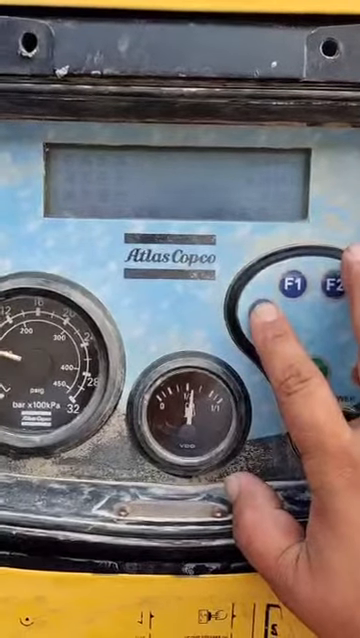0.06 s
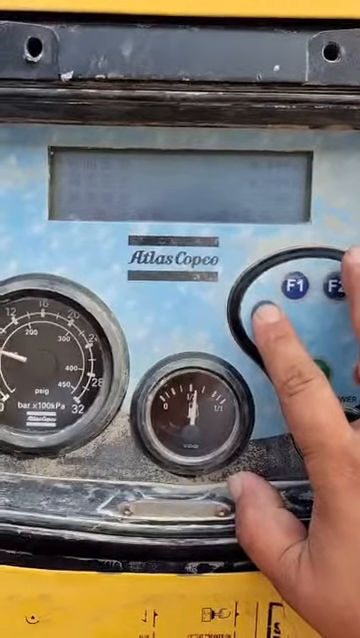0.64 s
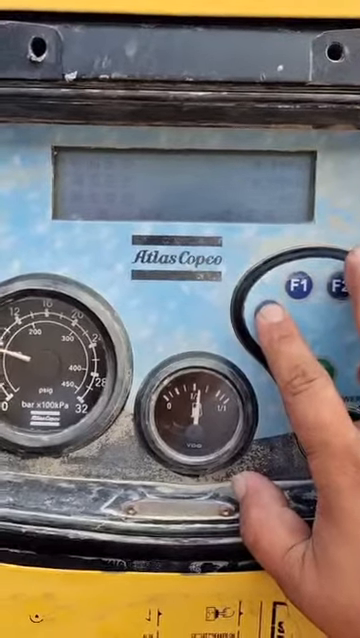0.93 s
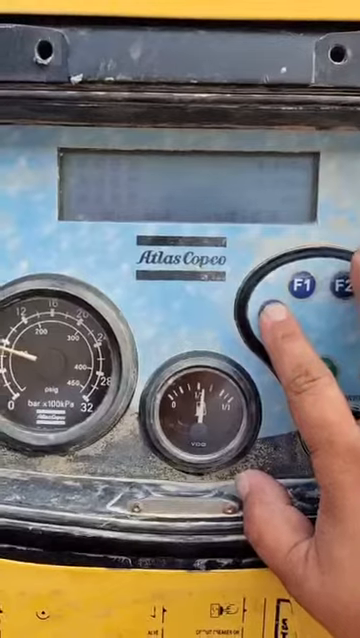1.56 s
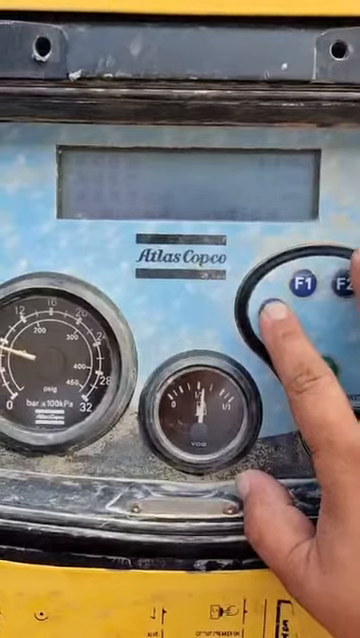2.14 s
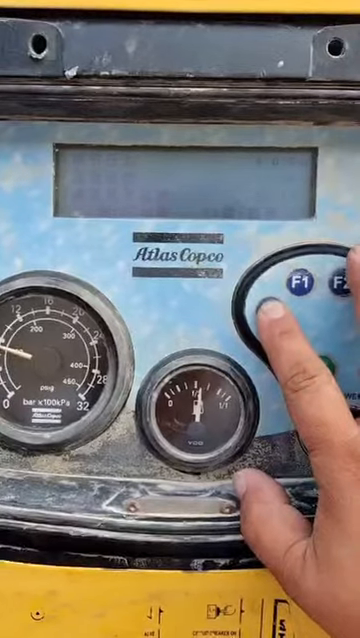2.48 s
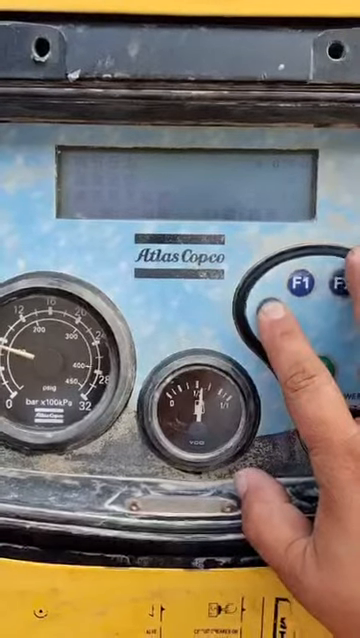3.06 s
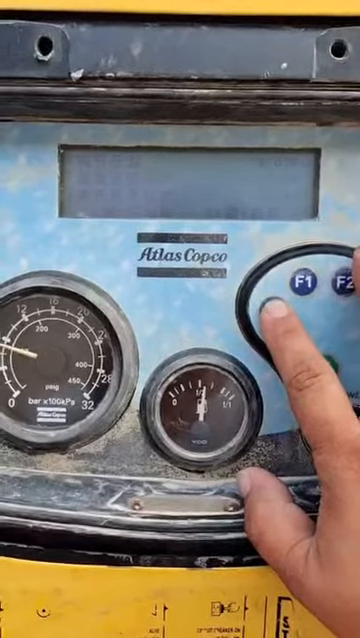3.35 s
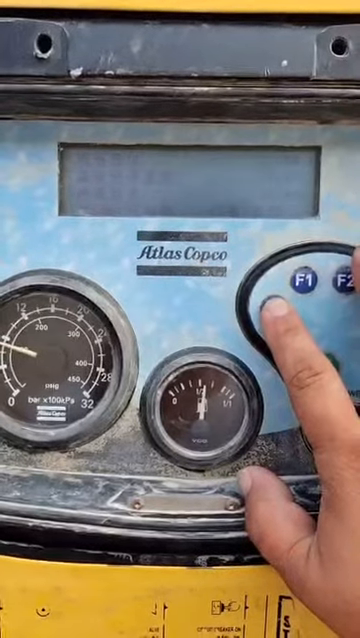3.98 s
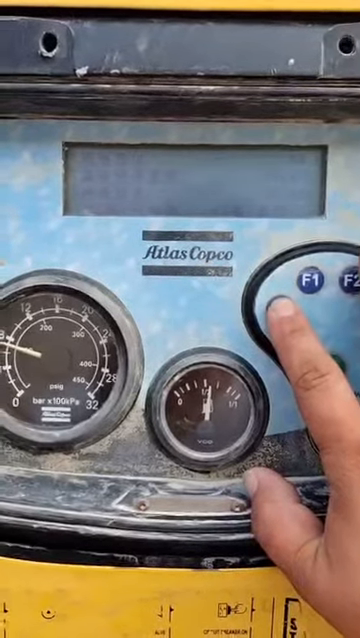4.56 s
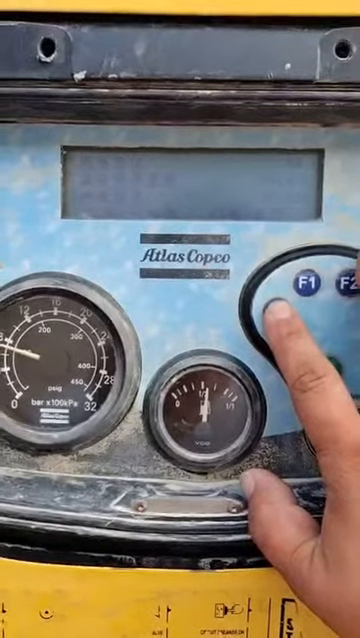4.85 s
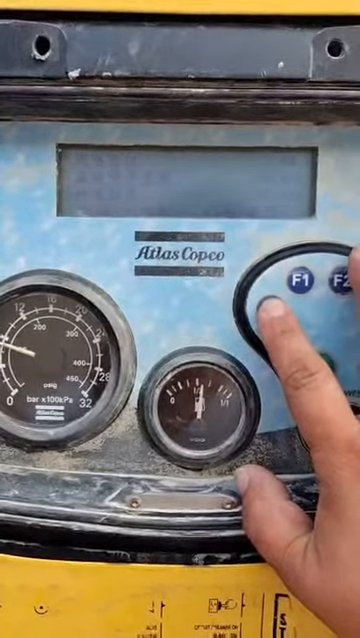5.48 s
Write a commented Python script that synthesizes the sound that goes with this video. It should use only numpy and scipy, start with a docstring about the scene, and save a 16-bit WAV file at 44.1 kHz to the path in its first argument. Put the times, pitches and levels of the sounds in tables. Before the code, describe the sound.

A portable diesel air compressor runs loudly at one constant speed outdoors, heard from right at its control panel. A deep exhaust drone carries rapid knocking and ticking valve clatter, along with a wavering whine, a fan hum and a rush of cooling air. Now and then a loose casing part gives a small ping or a dry clack. The sound stays even throughout.

```python
"""A six-cylinder diesel drives a portable air compressor at a steady 1200 rpm, outdoors, with the
microphone right at the control panel. The exhaust drones on multiples of the working cycle, each
firing knocks, and the valve gear clatters alike in every cycle. Around the engine the screw rotors
whine, the cooling fan hums and pushes a rush of air, and loose casing parts ping and clack.
A fast limiter behind the microphone rounds the peaks."""
import sys
import numpy as np
from scipy import signal
from scipy.fft import rfft, irfft, next_fast_len
from scipy.io import wavfile
from scipy.ndimage import uniform_filter1d, minimum_filter1d, map_coordinates

SR = 44100
rng = np.random.default_rng(int(sys.argv[2]) if len(sys.argv) > 2 else 0)


def materialize(psi):
    """Save the field psi as 16-bit PCM at rate SR to the path in sys.argv[1].

    A 1-D psi becomes a single channel; in a 2-D psi each row is a channel.
    """
    bounded = np.clip(np.atleast_2d(psi).T, -1, 1)
    quanta = np.round(bounded * 32767).astype(np.int16)
    wavfile.write(sys.argv[1], SR, quanta)


N = 247841
CYCLE_HZ = 9.992  # the engine's working cycle: two turns of the crank


def diesel(clock):
    """The engine from close by: its exhaust, and the metal that firings and valve gear strike."""
    cycles = CYCLE_HZ * clock
    drone = exhaust(clock)
    force = firings(cycles) * effort(clock)
    return drone + clatter(cycles, force) + knock(force) + rings(force) + tappet(cycles) + valves(cycles)


# exhaust drone; order 6 is the firing rate: (order [multiple of the cycle], relative level [dB])
DRONE_ORDERS = [(5, -42), (6, -17.7), (7, -41), (9, -33), (10, -32), (11, -38), (12, -18.9), (15, -28),
                (16, -29), (17, -29), (23, -35), (24, -31), (25, -28.7), (26, -28.5), (27, -29.7),
                (28, -28.5), (29, -33), (30, -33.5), (32, -36), (33, -35), (39, -31.5), (40, -36),
                (42, -30.3), (45, -38), (50, -40), (54, -37), (56, -36), (57, -38), (58, -38), (59, -33),
                (60, -38), (76, -36), (80, -37.5), (82, -39.5), (83, -44), (93, -44), (99, -42.5),
                (105, -42), (114, -41), (124, -46), (129, -43), (208, -47)]
# swell and sag of the exhaust's boom: (time [s], relative level [dB])
BOOM_CURVE = [(0.0, -18.5), (0.12, -12), (0.69, -14), (0.77, -20.5), (0.85, -12), (0.94, -15), (1.08, -13),
              (1.99, -16.5), (2.07, -13), (2.17, -16), (2.6, -12), (2.85, -15.5), (3.26, -13.5), (3.3, -15),
              (4.35, -13), (4.38, -14.5), (5.57, -13.5), (5.62, -20)]
def exhaust(clock, boom_order=18, drone_db=1.18, boom_db=-12.5):
    """The exhaust drones on multiples of the cycle and booms loudest at three times the firing rate."""
    partials = [(order * CYCLE_HZ, db) for order, db in DRONE_ORDERS]
    drone = tones(clock, partials, waver_db=0.5, waver_hz=7)
    boom = contour(BOOM_CURVE) * np.sqrt(2) * np.sin(2 * np.pi * boom_order * CYCLE_HZ * clock)
    return undb(drone_db) * drone + undb(boom_db) * boom


# each cylinder's knock, in firing order: (relative level [dB])
CYLINDER_DB = [-1.3, 2, 0.9, -0.7, -0.8, 0.7]
def firings(cycles, first=0.269, second_blow=0.073, scatter_db=0.6):
    """Knock strength, rms 1: each uneven firing blends into the next; combustion and an injector or valve blow
    strike twice a firing."""
    stroke = (cycles - first + 1) * len(CYLINDER_DB) + 1
    count = np.arange(int(stroke.max()) + 2)
    size_db = np.take(CYLINDER_DB, count, mode="wrap") + scatter_db * rng.standard_normal(len(count))
    force = undb(np.interp(stroke, count, size_db)) * (1 + second_blow * np.cos(2 * np.pi * 2 * stroke))
    return force / np.sqrt(np.mean(force ** 2))


# firings that knock harder: (time [s], extra level [dB])
HARD_FIRINGS = [(0.227, 1.5), (0.527, 5), (0.64, 2), (0.731, 3), (0.826, 3.5), (0.933, 1.5), (1.045, 1.5),
                (1.232, 3.5), (1.628, 1.3), (2.042, 4.5), (2.134, 2), (2.235, 1.5), (2.632, 2), (2.942, 1),
                (3.294, 2.5), (3.725, 4.5), (4.43, 1.8), (4.642, 1), (4.836, 3.5), (5.115, 2)]
def effort(clock, waver_db=0.3, rise_s=0.023, fade_s=0.022):
    """Gain of the knock: it wavers with the load and swells briefly at each hard firing."""
    db = waver_db * walk(9)
    for time, extra_db in HARD_FIRINGS:
        age = clock - time
        db = db + extra_db * np.exp(-(age / np.where(age < 0, rise_s, fade_s)) ** 2)
    return undb(db)


# spectrum of combustion and piston slap: (frequency [Hz], relative density [dB per Hz])
KNOCK_SPECTRUM = [(150, -65), (400, -47.5), (750, -53), (980, -59.5), (1380, -57), (1650, -60.5),
                  (2180, -58), (3050, -75), (3680, -68), (4300, -76.5), (5900, -75), (7200, -87),
                  (8200, -100), (12000, -104.5)]
def knock(force, db=-0.12):
    """Combustion and piston slap make fresh noise at each firing."""
    return undb(db) * colour(force * rng.standard_normal(N), KNOCK_SPECTRUM)


# spectrum of block and valve gear: (frequency [Hz], relative density [dB per Hz])
CLATTER_SPECTRUM = [(100, -73.5), (200, -55.5), (320, -51.5), (570, -50.5), (820, -57), (1150, -56.5),
                    (1650, -62.5), (2150, -65.5), (2700, -68), (3650, -85.5), (5200, -90.5), (8000, -120)]
def clatter(cycles, force, slack_s=0.00006, db=-0.2):
    """The same parts strike at the same crank angles, so one cycle of rattle comes round again."""
    rattle = rng.standard_normal(int(SR / CYCLE_HZ))
    place = (cycles + CYCLE_HZ * slack_s * walk(90)) % 1  # slack makes strikes early or late
    repeating = map_coordinates(rattle, [place * len(rattle)], order=3, mode="wrap")
    return undb(db) * colour(force * repeating, CLATTER_SPECTRUM)


# resonances of rocker cover and injector lines: (frequency [Hz], width [Hz], level [dB])
METAL_MODES = [(1401, 19, -40), (2093, 50, -41.5), (2260, 70, -46), (3420, 150, -54), (3730, 120, -50.5)]
def rings(force, spread_db=5.0):
    """Dense uneven taps set each thin metal part ringing on its own."""
    out = 0
    for hz, width, db in METAL_MODES:
        taps = force * undb(spread_db * walk(70)) * rng.standard_normal(N)
        ring = signal.lfilter(*signal.iirpeak(hz, hz / width, fs=SR), taps)
        out = out + undb(db) * ring / ring.std()
    return out


# spectrum of the tappet's tick: (frequency [Hz], relative density [dB per Hz])
TAPPET_SPECTRUM = [(500, -75), (1000, -47.5), (2200, -54), (3200, -77), (6000, -110)]
def tappet(cycles, db=-5.5):
    """One slack tappet ticks at the same point of every working cycle."""
    ticks = cycle_pulse(cycles, place=0.585, half_width_s=0.00099)
    return undb(db) * colour(ticks * rng.standard_normal(N), TAPPET_SPECTRUM)


# valves that seat loudly: (place in the cycle [0-1], relative level [dB], half-width [s])
VALVE_HITS = [(0.27, -2.3, 0.006), (0.92, -3.5, 0.003)]
# spectrum of their chatter: (frequency [Hz], relative density [dB per Hz])
VALVE_SPECTRUM = [(1200, -85), (2400, -65.5), (3000, -69.5), (3700, -65.5), (4400, -73.5), (5800, -77),
                  (7200, -84), (9000, -112)]
def valves(cycles, waver_db=1.5):
    """Two valves seat with a bright metallic chatter in every working cycle."""
    hits = sum(undb(db) * cycle_pulse(cycles, place, width) for place, db, width in VALVE_HITS)
    return colour(hits * undb(waver_db * walk(12)) * rng.standard_normal(N), VALVE_SPECTRUM)


# harmonics of the screw's lobes, from the first up: (relative level [dB])
LOBE_HARMONICS = [-40, -28.5, -19, -46, -53, -50]
# wavering of the whine: (time [s], relative level [dB])
WHINE_CURVE = [(0.0, -27), (0.03, -20.5), (0.51, -25.5), (0.56, -23), (1.56, -23.5), (1.69, -18.5),
               (1.72, -26), (2.32, -21.5), (2.33, -27), (2.55, -22), (2.71, -26), (2.74, -19),
               (2.93, -26.5), (3.03, -19), (3.18, -23), (3.19, -29), (3.26, -20.5), (3.47, -25),
               (3.96, -21.5), (4.01, -30.5), (4.07, -22), (4.3, -26), (4.49, -19), (4.54, -25.5),
               (4.62, -20), (4.87, -25.5), (4.93, -17.5), (5.02, -24), (5.29, -20), (5.4, -27), (5.43, -19),
               (5.53, -20), (5.56, -28.5), (5.62, -26.5)]
def screw(clock, lobe_hz=197.78, twist_s=0.00006):
    """Lobes release air in pulses; each firing twists the drive and puts sidebands on the whine."""
    twisted = clock + twist_s * np.sin(2 * np.pi * len(CYLINDER_DB) * CYCLE_HZ * clock)
    partials = [(k * lobe_hz, db) for k, db in enumerate(LOBE_HARMONICS, 1)]
    return contour(WHINE_CURVE) * tones(twisted, partials, waver_db=1.5, waver_hz=12)


# harmonics of the fan's blades, from the first up: (level [dB])
BLADE_HARMONICS = [-21, -31.5]
# cooling air through the canopy: (frequency [Hz], density [dB per Hz])
AIR_SPECTRUM = [(15, -66), (45, -44), (85, -48), (150, -36), (230, -39.5), (410, -45.5), (505, -52.5),
                (575, -45.5), (660, -52), (830, -52.5), (950, -58), (2200, -65), (5800, -81), (9000, -100),
                (12000, -87)]
def fan(clock, blade_hz=214.15, gust_db=0.46):
    """The passing blades hum and push a turbulent rush of cooling air."""
    rush = colour(undb(gust_db * walk(11)) * rng.standard_normal(N), AIR_SPECTRUM)
    partials = [(k * blade_hz, db) for k, db in enumerate(BLADE_HARMONICS, 1)]
    return rush + tones(clock, partials, waver_db=-0.4, waver_hz=5.9)


# jolts of loose casing parts: (time [s], pitch [Hz], peak level [dB])
CASING_PINGS = [(0.222, 2080, -19), (0.322, 3620, -29), (0.826, 4450, -31), (0.828, 3600, -34),
                (1.623, 3730, -28), (1.650, 2060, -26), (1.726, 4330, -35), (1.737, 2330, -20),
                (2.036, 2230, -22), (2.229, 3380, -29), (2.726, 3700, -34), (3.290, 2170, -23),
                (3.291, 3500, -32), (3.943, 3664, -27), (4.119, 1290, -17), (4.889, 3500, -31),
                (5.100, 2870, -29), (5.125, 3300, -31)]
def pings(buzz_rad=1.0, buzz_hz=600):
    """A jolted part rings briefly and buzzes as it does, which blurs its pitch."""
    t = np.arange(N) / SR
    out = 0
    for start, hz, db in CASING_PINGS:
        phase = 2 * np.pi * hz * (t - start) + buzz_rad * walk(buzz_hz)
        out = out + undb(db) * struck(start, rise_s=0.0024, t60_s=0.092) * np.sin(phase)
    return out


# blows of a casing panel: (time [s], relative level [dB], time to fall 60 dB [s])
PANEL_BLOWS = [(0.822, -3, 0.059), (1.735, -5, 0.018), (1.896, -0.5, 0.017)]
# spectrum of a blow: (frequency [Hz], relative density [dB per Hz])
PANEL_SPECTRUM = [(300, -62), (900, -39.5), (1500, -46.5), (2500, -54), (3200, -64), (4500, -66),
                  (6000, -76), (9000, -95)]
def clacks(contact_s=0.0005):
    """A shaken panel clacks drily against its frame."""
    blows = sum(undb(db) * struck(start, contact_s, t60_s) for start, db, t60_s in PANEL_BLOWS)
    return colour(blows * rng.standard_normal(N), PANEL_SPECTRUM)


def crank(hunt_s=0.00012, shake_s=0.000015):
    """The crank's own clock [s]: the governor hunts slowly, and quick random nudges shake it."""
    return np.arange(N) / SR + hunt_s * walk(2.2) + shake_s * walk(40)


def undb(db):
    """Decibels to gain."""
    return np.exp(np.asarray(db) * (np.log(10) / 20))


def colour(noise, spectrum):
    """Give white noise of rms 1 a spectrum of (frequency [Hz], density [dB per Hz]) points."""
    hz, db = np.transpose(spectrum)
    size = next_fast_len(N + 8192)
    bin_hz = np.maximum(np.arange(size // 2 + 1) * SR / size, 1)
    gain = undb(np.interp(np.log(bin_hz), np.log(hz), db)) * np.sqrt(SR / 2)
    return irfft(rfft(noise, size) * gain, size)[:N]


def walk(rate_hz, substeps=8):
    """A smooth random waver of spread 1 that takes rate_hz new values a second."""
    steps = np.repeat(rng.standard_normal(int(rate_hz * N / SR) + 2), substeps)
    smooth = uniform_filter1d(uniform_filter1d(steps, substeps), substeps)
    positions = np.arange(len(smooth)) * SR / (rate_hz * substeps)
    return np.interp(np.arange(N), positions, smooth / smooth.std())


def tones(clock, partials, waver_db, waver_hz):
    """Sines of (frequency [Hz], rms level [dB]) that follow a shaft's clock and waver in level."""
    out = 0
    for hz, db in partials:
        phase = 2 * np.pi * (hz * clock + rng.random())
        out = out + undb(db + waver_db * walk(waver_hz)) * np.sin(phase)
    return np.sqrt(2) * out


def contour(curve):
    """Gain from a curve of (time [s], level [dB]), taken about its own mean."""
    db = np.interp(np.arange(N) / SR, *np.transpose(curve))
    return undb(db - db.mean())


def cycle_pulse(cycles, place, half_width_s):
    """A bell-shaped pulse at the same place in every working cycle."""
    age = ((cycles - place + 0.5) % 1 - 0.5) / CYCLE_HZ
    return np.exp(-(age / half_width_s) ** 2)


def struck(start, rise_s, t60_s):
    """Envelope of a tap: a quick rise, then an exponential decay; peak 1."""
    age = np.maximum(np.arange(N) / SR - start, 0)
    shape = (1 - np.exp(-age / rise_s)) * np.exp(-np.log(1000) * age / t60_s)
    return shape / shape.max()


def scene():
    """At the control panel, in mono: one crank drives engine, screw and fan; the casing rattles."""
    clock = crank()
    return (diesel(clock) + screw(clock) + fan(clock) + pings() + clacks())[None]


def record(dry, ceiling=0.87, hold_s=0.005, input_db=0.54, top_hz=12100):
    """The close microphone feeds a fast limiter that ducks the peaks; the top treble is then cut."""
    mic = undb(input_db) * dry
    span = max(int(hold_s * SR), 1)
    allowed_gain = ceiling / np.maximum(np.abs(mic), ceiling)
    held_gain = minimum_filter1d(allowed_gain, 2 * span + 1)
    gain = uniform_filter1d(uniform_filter1d(held_gain, span), span)
    lowpass = signal.ellip(10, 0.2, 80, top_hz, fs=SR, output="sos")
    return signal.sosfilt(lowpass, mic * gain)


dry = scene()
out = record(dry)
materialize(out)
```